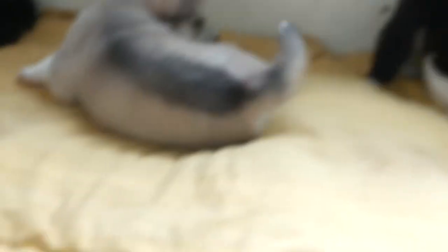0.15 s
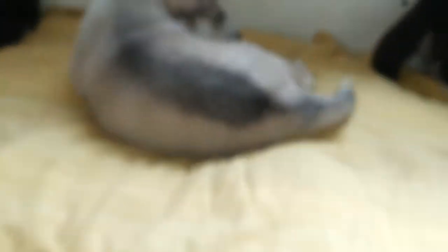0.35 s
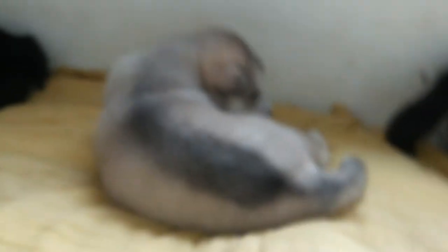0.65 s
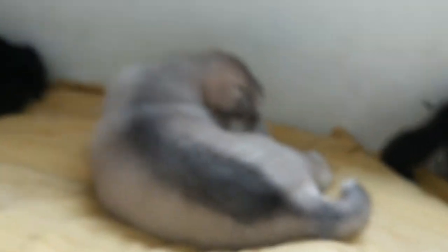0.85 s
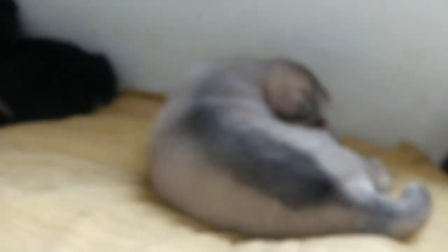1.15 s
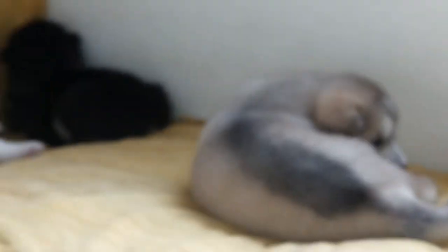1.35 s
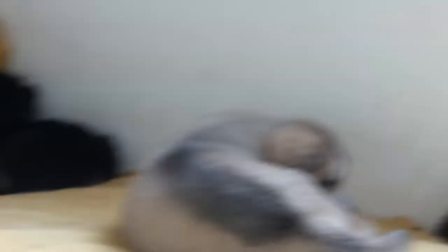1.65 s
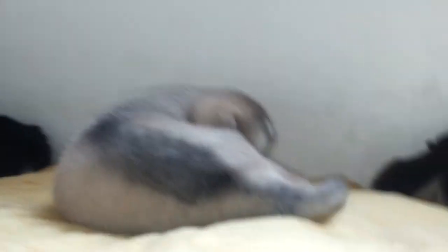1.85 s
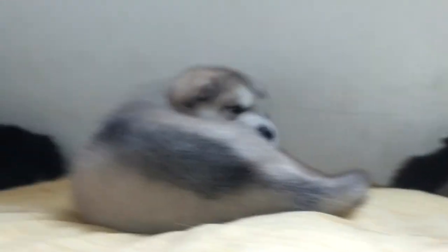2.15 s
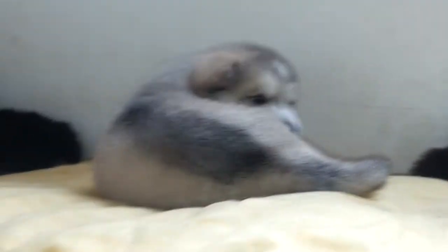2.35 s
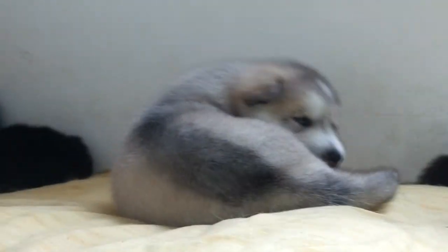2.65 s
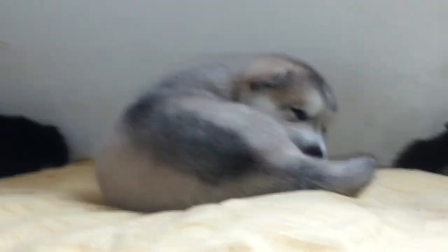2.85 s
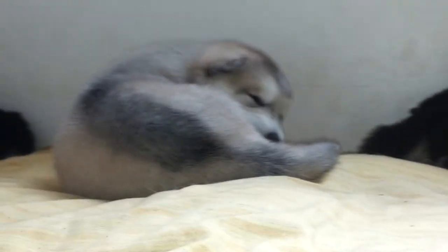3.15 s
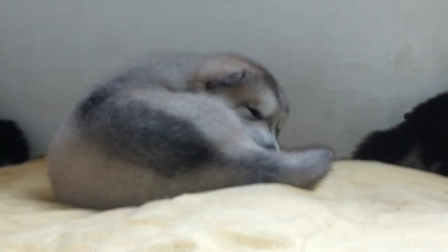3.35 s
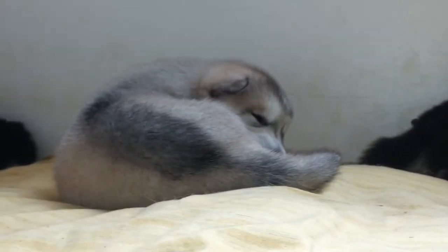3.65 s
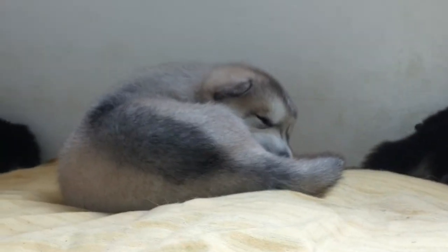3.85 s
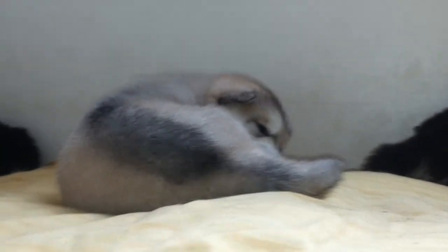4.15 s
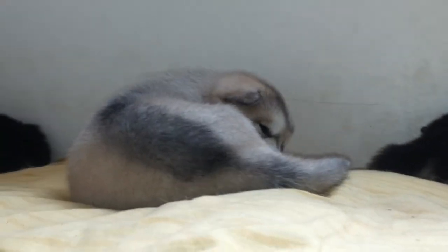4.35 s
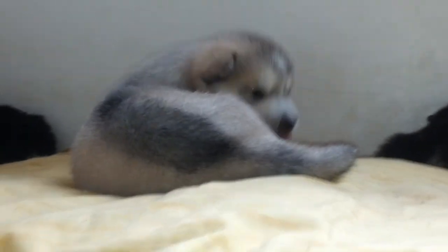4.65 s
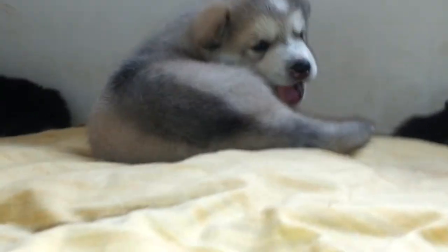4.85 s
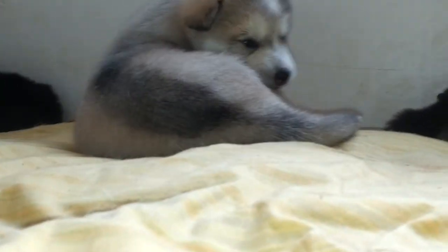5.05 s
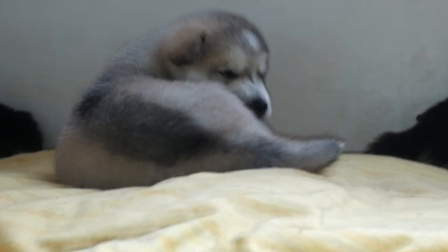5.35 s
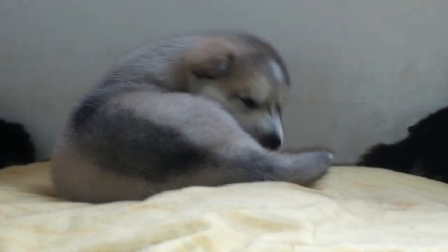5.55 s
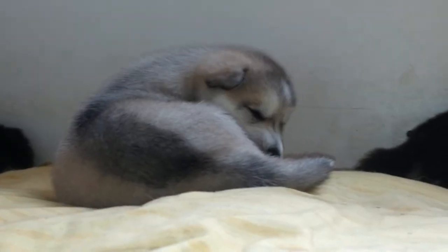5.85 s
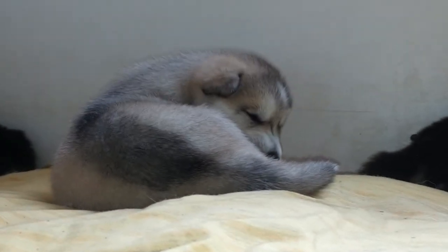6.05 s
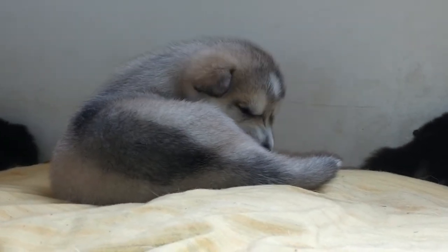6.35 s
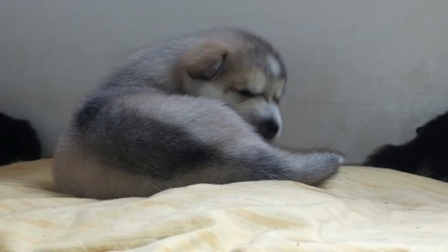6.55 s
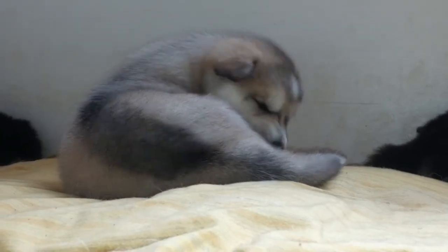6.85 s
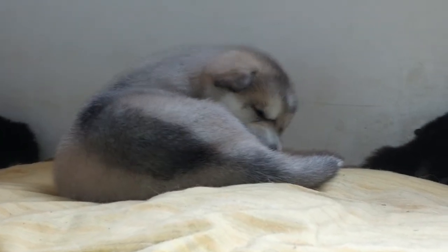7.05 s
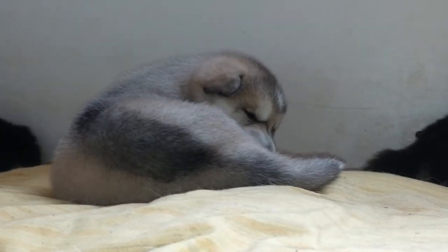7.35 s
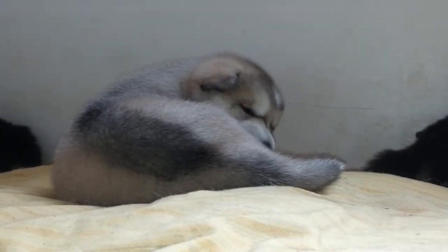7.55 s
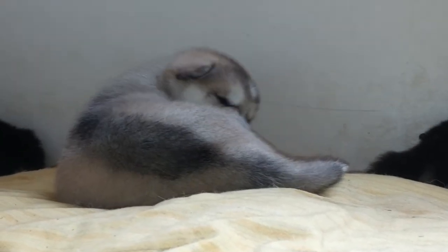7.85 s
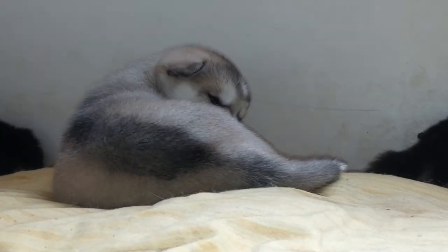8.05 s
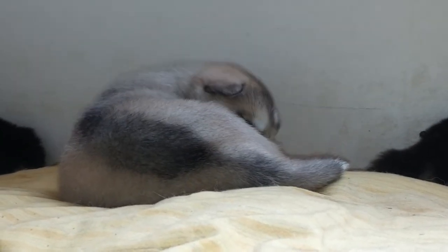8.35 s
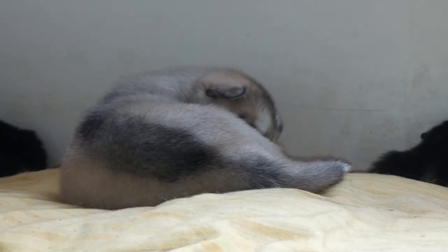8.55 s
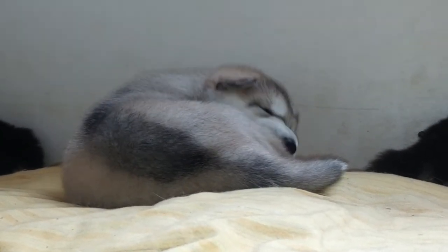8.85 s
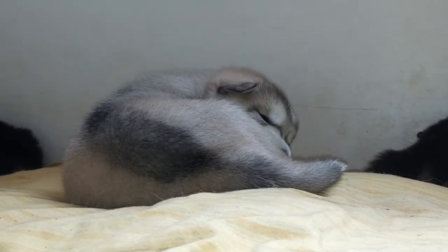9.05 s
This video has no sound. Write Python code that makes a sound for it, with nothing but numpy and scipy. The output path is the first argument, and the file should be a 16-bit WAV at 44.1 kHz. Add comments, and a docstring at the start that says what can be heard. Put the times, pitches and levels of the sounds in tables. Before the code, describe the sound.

Young puppies on a blanket in a small, fairly dry room, heard very near. First a rough low grumble and two short yips, then creaking and soft coos, a quick catch of air and a sneeze. After a pause, clear whistling whimpers come one after another, falling in pitch and growing breathier and shakier, with nose puffs, wet mouth clicks and muffled paw bumps. Faint hiss rises with the louder calls.

```python
"""Puppies on a blanket

A litter of young puppies on a blanket in a small room, near the microphone, with the room well behind.
One grumbles low, creaks and sneezes from damped pulses and noise; after two early yips another whines
through its nose in seven clear, falling calls, each nearly a sine with faint resonant upper partials.
A third sniffs (shaped noise); low thumps, mostly paws on the bedding, are damped swings. The recorder's
hiss rises with loud sound and the room's rumble ducks under it."""
import sys
import numpy as np
from scipy import signal
from scipy.fft import rfft, irfft, next_fast_len
from scipy.io import wavfile
from scipy.ndimage import uniform_filter1d

SR = 44100
rng = np.random.default_rng(int(sys.argv[2]) if len(sys.argv) > 2 else 0)


def inscribe(sig):
    """Save sig as 16-bit PCM at rate SR to the path in sys.argv[1].

    A 1-D sig is mono; a 2-D sig holds one channel per row.
    Samples are clipped to [-1, 1] before scaling.
    """
    pcm = np.round(np.clip(np.atleast_2d(sig).T, -1, 1) * 32767)
    wavfile.write(sys.argv[1], SR, pcm.astype(np.int16))


def makeup_ratio(level_db):
    """Linear amplitude ratio for a level in decibels (20 dB per factor of ten)."""
    decades = np.asarray(level_db, float) / 20
    return 10 ** decades


N = 405719

# spectrum of the recorder's hiss, relative: [f/Hz, level/dB]
HISS_SPECTRUM = [(110, -28), (180, -11), (339, -11.5), (433, -15), (617, -14.5), (690, -15.5), (1140, -21),
                 (1300, -20.5), (1430, -21), (3370, -26), (4800, -26), (15600, -29.5)]
# spectrum of the room's rumble ahead of the low cut, relative: [f/Hz, level/dB]
RUMBLE_SPECTRUM = [(12, -44), (20, -16.5), (86, -4), (118, -6), (154, -5), (185, -10), (200, -17),
                   (260, -56.5), (440, -120)]
# low thumps, mostly paws on the bedding: [t/s, peak level/dB, f/Hz]
LOW_THUMPS = [(1.277, -48, 210), (1.497, -43, 412), (1.578, -41, 288), (2.016, -47, 210), (2.586, -52, 132),
              (2.688, -44.5, 420), (2.77, -50, 213), (3.859, -48.5, 291), (4.208, -45, 331),
              (4.589, -46.5, 342), (5.702, -42.5, 366), (6.133, -46, 296), (6.405, -47, 234),
              (7.05, -45.5, 231), (7.719, -33.5, 237), (8.79, -39.5, 210), (0.22, -37, 250)]
# small wet clicks of tongue and lips: [t/s, peak level/dB, f/Hz]
LIP_SMACKS = [(1.565, -41, 2300), (1.9596, -40.5, 7300), (2.0093, -35, 2300), (2.304, -43, 5270),
              (2.7855, -49.5, 2230), (3.2944, -50, 8600), (3.8017, -44, 7600), (4.8249, -43, 6250),
              (7.0504, -50, 7930), (8.5624, -37.5, 6420), (8.95, -41.5, 9000)]
# sniffs and breaths through the nose: [peak t/s, peak level/dB, rise/s per 20 dB, fall/s per 20 dB]
SNIFF_PUFFS = [(.1, -61, .8, .8), (.42, -62, .6, .5), (.735, -56, .35, .45), (.96, -66, .3, .2),
               (1.5, -63, .15, .6), (1.566, -51, .015, .03), (2.31, -59, .08, .25), (2.784, -63, .15, .16),
               (3.292, -67, .01, .1), (3.43, -65, .06, .08), (3.79, -63, .03, .11), (4.83, -58, .08, .16),
               (5.412, -55, .012, .12), (5.77, -50, .012, .24), (6.83, -62, .2, .4),
               (7.096, -46, .065, .09), (7.378, -52, .08, .2), (7.746, -50.5, .035, .075),
               (8.562, -59, .005, .07), (8.948, -73, .02, .1)]
# spectrum of the sniffed air, relative: [f/Hz, level/dB]
SNIFF_SPECTRUM = [(710, -35), (1200, -2), (2590, -0.5), (2830, -2), (4340, -2), (6170, 3.5), (7250, 3.5),
                  (7900, 1.5), (9470, -7.5), (15500, -12)]
# a catch of air, then the burst: [peak t/s, peak level/dB, rise/s per 20 dB, fall/s per 20 dB]
SNEEZE_PUFFS = [(1.958, -56, .011, .035), (2.02, -30.5, .018, .145)]
# spectrum of the sneezed air, relative: [f/Hz, level/dB]
SNEEZE_SPECTRUM = [(35, -36), (60, -12), (166, -18), (224, 3.5), (263, -9), (295, -3.5), (355, -10.5),
                   (514, -10.5), (695, -18), (875, -5), (1010, -17.5), (1450, -13.5), (2010, -14),
                   (6530, -18.5), (15000, -49.5)]
# short soft coos: [t/s, peak level/dB, f/Hz]
SOFT_COOS = [(.64, -44, 510), (.755, -41, 504), (1.538, -35.5, 690), (1.568, -34, 690), (1.62, -39, 550),
             (2.676, -43.5, 529)]
# lone pulses of the vocal folds: [t/s, relative level/dB, strongest ring f/Hz]
FOLD_PULSES = [(1.042, -49.5, 474), (1.395, -46, 450), (1.437, -43.5, 697), (1.455, -36.5, 464),
               (1.495, -35, 686), (1.512, -34.5, 515), (1.523, -32.5, 495), (1.545, -36, 664),
               (1.554, -32, 694), (1.575, -35, 683), (1.595, -31, 523), (1.612, -34.5, 506),
               (1.63, -33, 534), (2.248, -37, 458), (2.299, -36.5, 497), (2.323, -39, 495),
               (2.334, -41.5, 450), (2.586, -55, 506), (2.784, -45.5, 855)]
# throat resonances rung by those pulses: [f/Hz, width/Hz, relative level/dB]
PULSE_RINGS = [(308, 103, -5.5), (505, 96, -4), (690, 37, 2), (1370, 78, -11.5)]
# course of the low grumble: [t/s, pulse rate f/Hz, voice level/dB, strain (0 calm, 1 hard),
# fundamental level/dB]
GRUMBLE_COURSE = [(0.03, 143, -48, 1.7, -68), (0.103, 147, -38, 1.1, -49), (0.155, 144.5, -37.5, .9, -48),
                  (0.185, 140, -39.5, 1.1, -60), (0.258, 139.5, -39.5, 1.4, -55),
                  (0.282, 144.5, -37, .35, -49), (0.335, 129, -41, 0, -70), (0.406, 125.5, -44, .15, -71),
                  (0.44, 131.8, -42, .05, -70), (0.568, 131, -44.5, .2, -68), (0.622, 118.4, -46.5, 0, -80),
                  (0.694, 111.7, -51, .6, -80), (0.722, 113.3, -38, .6, -72), (0.742, 116, -43, .5, -80),
                  (0.778, 116.7, -40.5, .3, -70), (0.83, 115, -66, .5, -72)]
# throat resonances of the grumble: [f/Hz, width/Hz, relative level/dB]
THROAT_MODES = [(222, 70, -11), (407, 64, 1), (640, 100, -2), (960, 220, -10), (1445, 100, -12.5),
                (1710, 320, -19)]
# open-mouth resonances, per pass: [f/Hz, width/Hz, relative level/dB]
MOUTH_MODES = [(710, 420, 4.5), (940, 430, 6.5), (1390, 260, 0), (1720, 450, -1)]
# nose resonances, per pass: [f/Hz, width/Hz, relative level/dB]
NOSE_MODES = [(2850, 500, -7), (3814, 500, 3), (4573, 600, 5), (5380, 180, -3.5), (6920, 1200, 3.5),
              (7607, 500, -12)]
# two yips and seven whines, from full voice to the cut-off; one list per call:
# [t/s, pitch f/Hz, fundamental level/dB]
CALLS = [
    [(.64, 740, -43), (.651, 740, -32), (.654, 735, -32)],
    [(.708, 715, -32), (.724, 694, -31), (.75, 697, -38), (.765, 700, -35), (.79, 686, -47)],
    [(3.553, 1380, -48), (3.576, 1317, -35), (3.595, 1300, -32), (3.651, 1415, -37), (3.7, 1335, -29),
     (3.741, 1345, -31), (3.751, 1010, -35)],
    [(4.058, 1190, -43), (4.105, 1330, -34), (4.15, 1330, -33), (4.287, 1240, -34), (4.315, 1160, -29),
     (4.36, 1161, -29), (4.447, 1054, -25.5), (4.613, 1026, -28.5), (4.7, 987, -30), (4.728, 987, -29),
     (4.744, 987, -36), (4.761, 780, -41)],
    [(5.06, 1000, -36), (5.064, 912, -38), (5.085, 907, -36), (5.16, 958, -31), (5.254, 976, -30),
     (5.696, 913, -29.5), (5.712, 893, -30), (5.81, 872, -32), (5.835, 860, -29), (5.886, 822, -26),
     (5.918, 758, -25), (5.944, 820, -28), (5.951, 690, -23), (5.961, 710, -35)],
    [(6.29, 760, -56), (6.3, 830, -43), (6.312, 700, -28), (6.333, 679, -27), (6.373, 779, -26),
     (6.427, 715, -25.5), (6.461, 780, -26), (6.5, 748, -26.5), (6.53, 735, -26), (6.585, 720, -22.5),
     (6.78, 650, -32.5), (6.81, 636, -29), (6.874, 603, -28), (6.9, 600, -42)],
    [(7.272, 775, -47), (7.287, 800, -29), (7.314, 666, -29), (7.336, 620, -31), (7.378, 700, -28),
     (7.41, 635, -31), (7.444, 660, -32), (7.5, 712, -21.5), (7.53, 649, -27), (7.572, 630, -28)],
    [(7.95, 880, -40), (7.966, 715, -26), (8.046, 755, -28), (8.076, 722, -28), (8.09, 795, -26),
     (8.142, 694, -24), (8.188, 760, -26), (8.21, 712, -25), (8.318, 727, -24), (8.338, 680, -34),
     (8.355, 650, -30), (8.37, 630, -39)],
    [(8.75, 700, -44), (8.764, 717, -28.5), (8.795, 730, -25), (8.802, 595, -37), (8.818, 610, -35)],
]
# upper partials, one row per call: [level near 4 kHz/dB, its change/dB per s,
# level near 7 kHz/dB, its change/dB per s, octave lift/dB]
CALL_PARTIALS = [(-75, 0, -72, 0, 0), (-67, 0, -67, 0, -5), (-62, 25, -59, -15, 5), (-61, 0, -64, 8, 0),
                 (-53, -7, -51, -22, 0), (-63, 2, -63, 3, 0), (-65, 5, -65, 10, -1), (-62, 0, -62, 0, 0),
                 (-72, 0, -70, 0, -6)]
# the mouth lifts the octave of low notes: [pitch f/Hz, level/dB re a fundamental at USUAL_DB]
OCTAVE_LIFT = [(600, -20), (670, -21), (740, -24), (850, -23), (920, -33), (970, -39), (1050, -45),
               (1160, -37), (1240, -50), (1350, -50)]
# breath in the whining voice: [t/s, share 0-1]
BREATH_SHARE = [(0, .5), (3.5, .15), (4.2, .15), (4.35, .4), (4.5, .2), (4.7, .3), (5.05, .08), (5.7, .1),
                (5.83, .2), (5.9, .6), (6.3, .4), (6.42, .15), (6.7, .15), (6.78, .7), (7.3, .55),
                (7.6, .4), (7.95, .35), (8.4, .4), (9, .6)]
# where the voice breaks: [from t/s, to t/s, half-pitch partials before their fades, level/dB re fundamental]
VOICE_BREAKS = [(4.75, 4.775, -15), (5.929, 5.967, -22), (6.289, 6.35, -21.5), (6.757, 6.894, -13.5),
                (7.306, 7.384, -17), (7.416, 7.487, -17), (7.96, 7.968, -9), (8.045, 8.198, -35.5),
                (8.315, 8.37, -26.5), (8.791, 8.834, -21)]
# the voice catches for a moment: [t/s, half length/s, depth/dB]
VOICE_CATCHES = [(.715, .005, 22), (3.674, .012, 9), (4.13, .018, 4), (4.162, .008, 5), (5.862, .027, 26),
                 (7.302, .01, 22)]

HISS_DB, RUMBLE_DB = -64.5, -65   # in quiet; the rumble ahead of the low cut
ROOM_T60_S, WALL_CUT_HZ, ROOM_DB, BEDDING_HZ = 0.39, 5040, -20.5, 350
FAINT_THUMPS_DB = -54
USUAL_DB, OCTAVE_FOLLOWS = -27, .3   # the octave follows only a share of the voice's swing
ONSET_DB_PER_S, CUTOFF_DB_PER_S = 2300, 2000
# the nose opens after the onset; share of the voice's swing it follows
NASAL_START_DB, NASAL_OPEN_S, NASAL_FOLLOWS = -18, .08, .2


def rms_one(x):
    """Scales a signal to rms 1."""
    return x / np.sqrt(np.mean(x ** 2) + 1e-20)


def per_sample(control):
    """A control computed every 20th sample, filled in."""
    return np.interp(np.arange(N) / 20, np.arange(len(control)), control)


def in_time(rows):
    """Straight lines between table rows, one signal for each column after the time."""
    s, *columns = np.transpose(rows)
    return [np.interp(np.arange(N) / SR, s, column) for column in columns]


def sounding(rows, edge_s):
    """1 while the table lasts, with short fades inside both ends; a sound already under way has no fade-in."""
    t = np.arange(N) / SR
    since = t - rows[0][0] if rows[0][0] > .05 else 1
    return np.clip(np.minimum(since, rows[-1][0] - t) / edge_s, 0, 1)


def drift(rate_hz):
    """Slow chance, spread 1: noise through two equal poles at the given rate."""
    r = np.exp(-40 * np.pi * rate_hz / SR)   # computed every 20th sample
    noise = rng.standard_normal(N // 20 + 2002)
    slow = signal.lfilter([1], [1, -2 * r, r * r], noise)[2000:]
    return per_sample(rms_one(slow))


def coloured(spectrum):
    """Noise with a given spectrum, rms 1."""
    hz, db = np.transpose(spectrum)
    size = next_fast_len(N)
    bins_hz = np.arange(size // 2 + 1) * SR / size
    gain = makeup_ratio(np.interp(np.log(bins_hz + 1), np.log(hz), db))
    return rms_one(irfft(rfft(rng.standard_normal(size)) * gain, size)[:N])


def resonate(x, hz, width_hz):
    """One resonance, gain 1 on top."""
    r = np.exp(-np.pi * width_hz / SR)
    zeros = [(1 - r * r) / 2, 0, (r * r - 1) / 2]
    poles = [1, -2 * r * np.cos(2 * np.pi * hz / SR), r * r]
    return signal.lfilter(zeros, poles, x + 1e-18)


def tract(x, modes):
    """Resonances in parallel, signs alternating."""
    return sum((-1) ** k * makeup_ratio(db) * resonate(x, hz, width) for k, (hz, width, db) in enumerate(modes))


def blips(events, cycles, rise_cycles):
    """Each event is a short damped swing at its own pitch."""
    out = np.zeros(N + SR)
    for s, db, hz in events:
        turn = np.arange(int(3 * cycles * SR / hz)) * hz / SR
        decay = np.exp(-np.log(1000) * turn / (3 * cycles))
        swing = np.sin(2 * np.pi * turn) * decay * np.minimum(turn / rise_cycles, 1)
        out[round(s * SR):][:len(turn)] += makeup_ratio(db) * swing / np.abs(swing).max()
    return out[:N]


def puffs(events):
    """Gain of each puff rises to its peak and falls away at steady rates in dB."""
    t = np.arange(0, N, 20) / SR
    gain = 0
    for s, db, rise, fall in events:
        gain = gain + makeup_ratio(db - 20 * np.maximum((s - t) / rise, (t - s) / fall))
    return per_sample(gain)


def room_rumble(loud):
    """Low coloured noise of the room, drifting slowly and ducking under loud sound."""
    return makeup_ratio(RUMBLE_DB - 9 * loud + 1.1 * drift(8.4)) * coloured(RUMBLE_SPECTRUM)


def recorder_hiss(loud):
    """Coloured noise of the recorder, drifting slowly and rising with loud sound."""
    return makeup_ratio(HISS_DB + 5.9 * loud + 1.8 * drift(6.1)) * coloured(HISS_SPECTRUM)


def room(x):
    """Ten feedback delays, duller on every round."""
    size = next_fast_len(N + SR)
    turn = np.exp(-2j * np.pi * np.arange(size // 2 + 1) / size)   # delay of one sample
    dull = np.exp(-2 * np.pi * WALL_CUT_HZ / SR)
    walls = (1 - dull) / (1 - dull * turn)
    echo = 0
    for k, lag in enumerate((rng.uniform(.012, .04, 10) * SR).astype(int)):
        loop = makeup_ratio(-60 * lag / SR / ROOM_T60_S) * walls * turn ** lag
        echo = echo + (-1) ** k * loop / (1 - loop)
    return irfft(rfft(x, size) * echo, size)[:N]


def thumps():
    """Low damped swings: the clear thumps, and fourteen fainter ones scattered at random."""
    when, size, pitch = rng.random((14, 3)).T
    faint_hz = np.interp(pitch, [0, 1], [150, 400])
    faint = zip(when * N / SR, FAINT_THUMPS_DB + 5.0 * (size - .5), faint_hz)
    return blips(LOW_THUMPS + list(faint), 4.0, 0.35)


def smacks():
    """Wet clicks of tongue and lips, each a brief ringing at one high pitch."""
    return blips(LIP_SMACKS, 12.0, 1.4)


def breaths():
    """Air rushing through the nostrils; the sneeze is wet and sputters."""
    sniffs = puffs(SNIFF_PUFFS) * makeup_ratio(1.1 * drift(40)) * coloured(SNIFF_SPECTRUM)
    sputter_db = 2.5 * drift(120)
    sneeze = puffs(SNEEZE_PUFFS) * makeup_ratio(sputter_db) * coloured(SNEEZE_SPECTRUM)
    return sniffs + sneeze


def coos():
    """Soft voiced notes that swell over several cycles, then die away."""
    return blips(SOFT_COOS, 11.0, 8.0)


def creaks():
    """A lone soft clap of the folds rings the throat briefly, most at one pitch."""
    claps = np.zeros(N)
    claps[[round(s * SR) for s, _, _ in FOLD_PULSES]] = makeup_ratio(np.array(FOLD_PULSES)[:, 1])
    soft = signal.sosfilt(signal.butter(2, 1500, fs=SR, output="sos"), claps + 1e-18)
    strongest = makeup_ratio(-4) * blips(FOLD_PULSES, 4.3, 1.13)
    return strongest + makeup_ratio(38.5) * tract(soft, PULSE_RINGS)


def grumble():
    """Slack folds close about 130 times a second; strained, partials waver and a rasp throbs in the open mouth."""
    hz, voice_db, strain, chest_db = in_time(GRUMBLE_COURSE)
    waver_db = 1.0 + 2.0 * strain
    rasp_db = -12 + 13 * strain   # re voice
    cycle = 2 * np.pi * np.cumsum(hz * (1 + .004 * waver_db * drift(30))) / SR
    # partials 2 to 14, their phases spread so that each pulse is less sharp
    pulses = sum(np.cos(k * cycle + k * k * 0.384) * makeup_ratio(waver_db * drift(37.5)) for k in range(2, 15))
    throb = 1 + .6 * np.cos(cycle)
    rasp = .2 * pulses + rng.standard_normal(N) * throb * makeup_ratio(2.1 * drift(30))
    voiced = rms_one(tract(pulses, THROAT_MODES))
    chest = np.sqrt(2) * makeup_ratio(chest_db) * np.cos(cycle)
    mouth = rms_one(tract(tract(rasp, MOUTH_MODES), MOUTH_MODES))
    open_mouth = mouth + makeup_ratio(-24) * rms_one(tract(rasp, NOSE_MODES[2:]))
    return sounding(GRUMBLE_COURSE, 0.022) * (chest + makeup_ratio(voice_db) * (voiced + makeup_ratio(rasp_db) * open_mouth))


def call_levels():
    """Level of the fundamental and of the two nasal bands, in dB, call by call."""
    t = np.arange(0, N, 20) / SR
    levels = np.full((3, len(t)), -200.)
    for call, (low_db, low_slope, high_db, high_slope, _) in zip(CALLS, CALL_PARTIALS):
        s, _, db = np.transpose(call)
        since = t - s[0]
        edges_db = -ONSET_DB_PER_S * np.maximum(-since, 0) - CUTOFF_DB_PER_S * np.maximum(t - s[-1], 0)
        body_db = np.interp(t, s, db)
        opening_db = NASAL_START_DB * np.clip(1 - since / NASAL_OPEN_S, 0, 1)
        opening_db = opening_db + NASAL_FOLLOWS * (body_db - db.max())
        held_s = np.clip(since, 0, 1)
        low = opening_db + low_db + low_slope * held_s
        high = opening_db + high_db + high_slope * held_s
        levels = np.maximum(levels, edges_db + np.array([body_db, low, high]))
    for s, half, depth_db in VOICE_CATCHES:   # the nasal bands do not dip
        levels[0] -= depth_db * np.clip(1.5 - 1.5 * np.abs(t - s) / half, 0, 1)
    return [per_sample(level) for level in levels]


def octave_level(hz, one_db):
    """Level of the second partial re the fundamental, by pitch, loudness and call, drifting a little."""
    swing_db = np.maximum(one_db, -33) - USUAL_DB
    two_db = np.interp(hz, *np.transpose(OCTAVE_LIFT)) - (1 - OCTAVE_FOLLOWS) * swing_db + 2.5 * drift(8)
    lifts = [(row[0], partials[4]) for call, partials in zip(CALLS, CALL_PARTIALS) for row in (call[0], call[-1])]
    return two_db + in_time(lifts)[0]


def whines(jitter, flutter_db, husk_db):
    """Nearly a sine; upper partials show only where the nose resonates; uneven cycles add half-pitch partials."""
    hz = in_time(np.vstack(CALLS))[0]
    one_db, low_db, high_db = call_levels()
    two_db = octave_level(hz, one_db)
    breathy, = in_time(BREATH_SHARE)
    phase = 2 * np.pi * np.cumsum(hz * (1 + jitter * breathy * drift(40))) / SR
    fundamental = makeup_ratio(flutter_db * drift(23)) * np.sin(phase)
    octave = makeup_ratio(two_db + (1.5 + 6.2 * breathy) * drift(40)) * np.sin(2 * phase)

    broken = sum(makeup_ratio(db) * sounding([(start,), (end,)], 0.015) for start, end, db in VOICE_BREAKS)
    come_and_go = 1 + .5 * drift(50)
    halves = 0.18 * np.sin(phase / 2) + np.sin(3 * phase / 2) + 0.16 * np.sin(5 * phase / 2)
    halves *= broken * come_and_go
    # breath noise between the two lowest partials
    husk = makeup_ratio(husk_db) * breathy * drift(300) * np.sin(3 * phase / 2)

    partials = rms_one(sum(np.sin(k * phase) * makeup_ratio(2.5 * drift(12)) for k in range(3, 13)))
    source = np.sqrt(1 - breathy) * partials + 1.6 * np.sqrt(breathy) * rng.standard_normal(N)
    low, high = (rms_one(tract(tract(source, modes), modes)) for modes in (NOSE_MODES[:4], NOSE_MODES[4:]))
    clear = np.sqrt(2) * makeup_ratio(one_db) * (fundamental + octave + halves + husk)
    return clear + makeup_ratio(low_db) * low + makeup_ratio(high_db) * high


def scene():
    """All the puppies, near and in the room; the soft bedding sends little bass back."""
    voices = whines(jitter=0.01, flutter_db=0.85, husk_db=-31) + grumble() + creaks() + coos()
    near = voices + breaths() + thumps() + smacks()
    thin = signal.lfilter(*signal.butter(1, BEDDING_HZ, "high", fs=SR), near)
    return (near + makeup_ratio(ROOM_DB) * room(thin))[None]


def top_cut(x):
    """Nothing passes above the cut-off."""
    return signal.sosfilt(signal.butter(12, 15700, fs=SR, output="sos"), x)


def record(dry):
    """Loud sound raises the hiss and ducks the rumble; both return within a fraction of a second."""
    fall = 90 * np.arange(N) / SR   # release, 90 dB per s
    level = 10 * np.log10(uniform_filter1d(dry[0] ** 2, 600) + 1e-9)
    held = np.maximum.accumulate(level + fall) - fall
    loud = uniform_filter1d(np.clip((held + 56) / 18, 0, 1), 700)   # 0 below -56 dB, 1 above -38 dB
    low_cut = signal.butter(2, 55, "high", fs=SR, output="sos")
    mix = signal.sosfilt(low_cut, dry + recorder_hiss(loud) + room_rumble(loud))
    return top_cut(mix)


dry = scene()
out = record(dry)
inscribe(out)
```